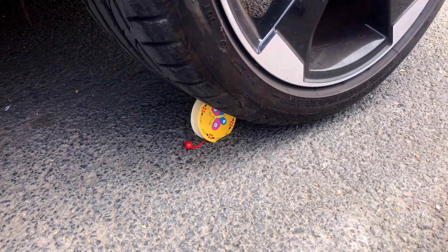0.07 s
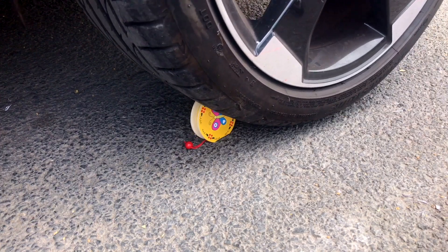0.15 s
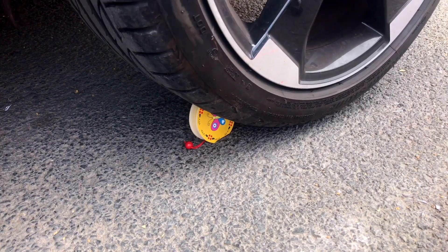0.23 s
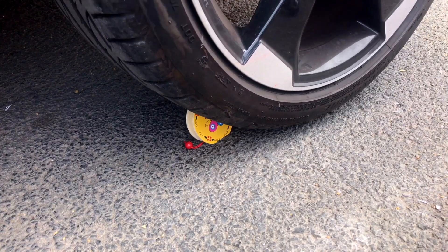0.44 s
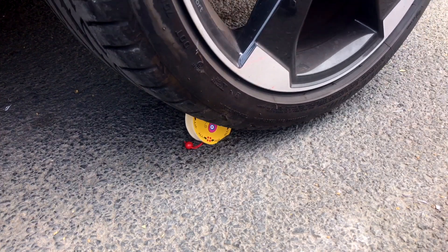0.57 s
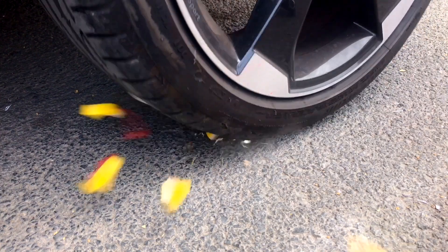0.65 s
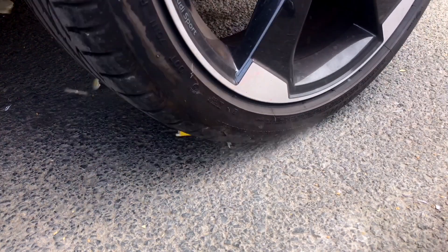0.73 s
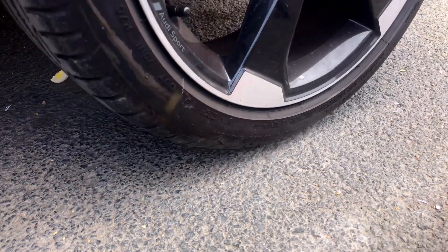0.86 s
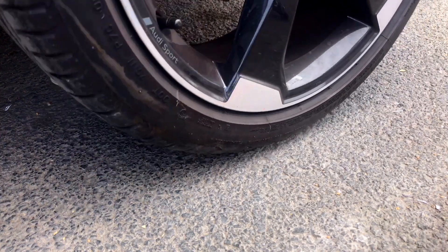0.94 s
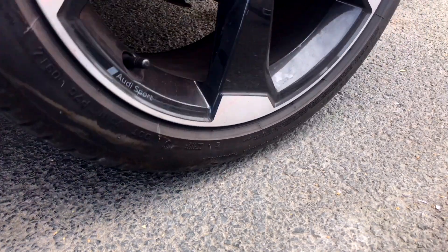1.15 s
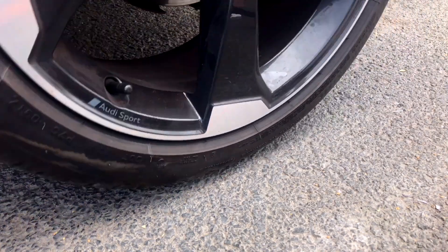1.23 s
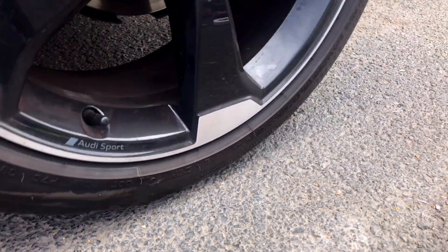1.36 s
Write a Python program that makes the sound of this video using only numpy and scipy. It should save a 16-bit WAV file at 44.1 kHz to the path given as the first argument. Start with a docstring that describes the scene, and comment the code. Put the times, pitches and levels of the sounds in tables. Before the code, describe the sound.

A plastic tub is squashed by a slow car tyre on asphalt: raspy rising squeal with hiss, clicks and sputters, a sharp wet burst with low thump, then grit crackles over quiet engine idle; close, outdoors.

```python
"""On asphalt, a car tyre rolls slowly over a small filled plastic tub, close to the microphone.
A fluttering slit at the lid excites the tub's resonances as a squeal and modulates noise into spray.
Falling tones and noise bursts make the sputter, the crack and the glugs; a rising sine makes the thump.
Decaying sines ring the wheel, brief resonant noise crackles under the tread, and harmonics of
the firing rate hum as the engine idles."""
import sys
import numpy as np
from scipy import signal
from scipy.fft import rfft, irfft, next_fast_len
from scipy.io import wavfile
from scipy.ndimage import uniform_filter1d, map_coordinates

SR = 44100
rng = np.random.default_rng(int(sys.argv[2]) if len(sys.argv) > 2 else 0)


def generate_wav(signal):
    """Clip the signal to [-1, 1] and save it as 16-bit WAV at the path in sys.argv[1]."""
    frames = np.transpose(np.atleast_2d(signal))
    scaled = np.clip(frames, -1, 1) * 32767
    pcm = np.round(scaled).astype(np.int16)
    wavfile.write(sys.argv[1], SR, pcm)


N = 61739  # samples
POP_S = .5948  # the air pops out, the flow through the slit ends and the wheel starts to ring


def amp(db):
    """Logarithmic level: decibels to amplitude gain."""
    return 10 ** (np.asarray(db) / 20)


def unit(x):
    """Normalisation of power: scale to rms 1."""
    return x / np.sqrt(np.mean(x ** 2) + 1e-20)


def clock():
    """Sampling: the time of every sample in seconds."""
    return np.arange(N) / SR


def curves(rows):
    """Linear interpolation: one value per sample for each column after the time."""
    times, *columns = np.transpose(rows)
    return [np.interp(clock(), times, column) for column in columns]


def wobble(rate):
    """Slow random modulation: a smooth curve through `rate` random knots a second."""
    return map_coordinates(rng.standard_normal(400), [clock() * rate], mode="mirror")


def white():
    """White noise: independent Gaussian samples."""
    return rng.standard_normal(N)


def filtered(x, response):
    """Linear filtering: multiply the spectrum by a response of frequency."""
    size = next_fast_len(N + SR // 2)
    spectrum = rfft(x, size) * response(np.fft.rfftfreq(size, 1 / SR))
    return irfft(spectrum, size)[:N]


def coloured(x, points):
    """Spectral shaping: filter through (f/Hz, level/dB) points on a log axis, to rms 1."""
    f, db = np.transpose(points)
    return unit(filtered(x, lambda hz: amp(np.interp(np.log(hz + 1), np.log(f), db))))


def noise(points):
    """Coloured noise: white noise with a shaped spectrum, at rms 1."""
    return coloured(white(), points)


def resonate(x, peaks):
    """Parallel damped resonators: (f/Hz, width/Hz, level/dB) peaks summed, to rms 1."""
    def response(f):
        total = 0
        for centre, width, db in peaks:
            damping = 1j * f * width
            total = total + amp(db) * damping / (centre * centre - f * f + damping)
        return total
    return unit(filtered(x, response))


def envelope(start, attack, hold, t60):
    """Exponential decay: linear attack, hold counted from the start, then 60 dB lost per t60."""
    age = clock() - start
    return np.clip(age / attack, 0, 1) * amp(-60 * np.maximum(age - hold, 0) / t60)


def grainy(depth_db, smoothing):
    """Amplitude modulation: random rough gain, averaged over `smoothing` samples, at rms 1."""
    return unit(amp(depth_db * unit(uniform_filter1d(white(), size=smoothing))))


def blip(s, hz, width, sag):
    """Air release as a falling tone, `hz` at its centre s, under a sech swell; gives tone and swell."""
    age = np.clip(clock() - s, -10 * width, 10 * width)
    swell = 1 / np.cosh(age / width * np.sqrt(2))
    cycles = hz * (1 - np.exp(-sag * age)) / sag
    return swell * np.sin(2 * np.pi * cycles), swell


# car motion: t/s, engine hum level/dB, tread on asphalt level/dB
CAR_LEVELS = [(0, -37, -54.5), (.55, -35, -40.5), (.72, -40.5, -61.5), (.81, -48, -58), (.88, -40.5, -57),
              (1.15, -40, -53.5), (1.4, -33, -50)]
# engine harmonics: multiple of the firing rate, relative level/dB
ENGINE_ORDERS = [(.5, -19), (1, 3), (1.5, -2.5)]
# engine rumble spectrum: f/Hz, relative level/dB
ENGINE_RUMBLE = [(20, -5.5), (50, 4.5), (120, -3.5), (240, -17), (600, -18), (1200, -68)]
# tread noise spectrum: f/Hz, relative level/dB
TREAD_SPECTRUM = [(300, -36), (550, 8), (900, 1.5), (2400, 1.5), (15500, -14.5)]


def car():
    """Harmonic synthesis: engine orders over rumble, a faint whine as the car moves on, gritty tread."""
    engine_db, tread_db = curves(CAR_LEVELS)
    mean_firing_hz, mean_whine_hz = 59.85, 550
    firings = np.cumsum(mean_firing_hz * (1 + .015 * wobble(12))) / SR
    hum = sum(amp(db) * np.sin(2 * np.pi * (order * firings + rng.random()))
              for order, db in ENGINE_ORDERS)
    engine = amp(engine_db) * (unit(hum) + amp(-6) * noise(ENGINE_RUMBLE))
    whine_cycles = np.cumsum(mean_whine_hz * (1 + 0.0056 * wobble(34.1))) / SR
    whine_gain = amp(-53.5 + 2.5 * wobble(9.43))
    whine_fade = np.clip((clock() - 0.754) / 0.14, 0, 1)
    whine = np.sin(2 * np.pi * whine_cycles) * whine_gain * whine_fade
    tread = amp(tread_db) * grainy(depth_db=2, smoothing=90) * noise(TREAD_SPECTRUM)
    return engine + whine + tread


# groan of the wall under load: t/s, level/dB
GROAN_LEVELS = [(.2, -60), (.4, -38.5), (.59, -29.5), (.66, -30), (.73, -52.5)]
# groan spectrum: f/Hz, relative level/dB
GROAN_SPECTRUM = [(50, 2), (120, 2.5), (230, 1.5), (330, -14.5), (900, -62)]


def groan():
    """Low-frequency noise under a load curve: the wall rumbles as it folds."""
    return amp(curves(GROAN_LEVELS)[0]) * noise(GROAN_SPECTRUM)


# modes of the wheel: f/Hz, level/dB, t60/s
WHEEL_MODES = [(211.4, -25, 0.26), (624, -31.5, 0.2), (1444, -38, 0.14), (2170, -28, 0.082)]


def wheel():
    """Modal decay: the burst rings the air in the tyre and the metal rim."""
    age = clock() - POP_S
    out = np.zeros(N)
    for hz, db, t60 in WHEEL_MODES:
        mode = np.sin(2 * np.pi * (hz * age + rng.random()))
        out += amp(db) * envelope(POP_S, 0.0026, 0.017, t60) * mode
    return out


# fractures under the tread: t/s, crack level/dB, ring f/Hz, t60/s, ring over crack level/dB
CRACKLE_EVENTS = [(0.646, -43.5, 1370, 0.029, 16.5), (0.8738, -43.5, 12500, 0.019, 1),
                  (0.878, -45, 6080, 0.1, 5), (0.9302, -42.5, 3020, 0.022, 13),
                  (0.938, -47.5, 2420, 0.074, 8.5), (1.037, -40, 870, 0.015, -3.5),
                  (1.048, -38.5, 7400, 0.022, 3), (1.046, -48, 5060, 0.046, 8),
                  (1.07, -46, 12100, 0.079, -2.5), (1.098, -56, 3200, 0.068, 6.5),
                  (1.283, -48, 12100, 0.076, 2.5), (1.3431, -40.5, 2020, 0.062, 7),
                  (1.3442, -47, 1070, 0.041, 3), (1.355, -41, 4200, 0.069, -1),
                  (1.3547, -37, 5150, 0.032, 1)]
# crack spectrum: f/Hz, relative level/dB
CRACK_SPECTRUM = [(200, -37), (900, 8.5), (7000, 5.5), (12000, 0.5)]


def crackles():
    """Brittle fracture: shards and grit crack under the tread, each with a ring band of its own."""
    out = np.zeros(N)
    for s, db, hz, t60, ring_db in CRACKLE_EVENTS:
        ring = resonate(white(), [(hz, hz * 0.13, 0)])
        crack = noise(CRACK_SPECTRUM)
        out += amp(db) * envelope(s, 0.000093, 0.00059, t60) * (crack + amp(ring_db) * ring)
    return out


# snaps of the plastic wall: t/s, level/dB, t60/s
SNAP_EVENTS = [(0.3209, -16.5, 0.0098), (0.4319, -14, 0.0098), (0.5813, -20, 0.01), (0.5843, -20.5, 0.023),
               (.646, -29, 0.0081)]
# snap spectrum: f/Hz, relative level/dB
SNAP_SPECTRUM = [(500, -17), (2500, 0.5), (15000, 0.5)]


def snaps():
    """Buckling impulses: the wall kinks with short bright clicks."""
    gain = sum(amp(db) * envelope(s, 0.00025, 0.00015, t60) for s, db, t60 in SNAP_EVENTS)
    return noise(SNAP_SPECTRUM) * gain


# spits of trapped air: t/s, level/dB
SPIT_EVENTS = [(0.375, -28), (0.395, -22), (0.4125, -26), (0.4233, -19.5), (0.4442, -18.5), (0.4535, -27),
               (0.4727, -19.5), (.482, -19), (0.5054, -22), (.528, -22.5), (.54, -20.5), (0.5578, -22.5),
               (0.5686, -20.5), (0.577, -18.5)]


def sputter():
    """Intermittent jet: as the tub empties, the flow breaks into falling tones with bursts of mist."""
    out = np.zeros(N)
    mist = noise([(600, 12.5), (1500, 1.5), (8000, 4.0), (15000, -33)])  # f/Hz, relative level/dB
    for s, db in SPIT_EVENTS:
        hz = 1244 * (1 + .05 * rng.standard_normal())
        tone, swell = blip(s, hz, width=0.00066, sag=130)
        out += amp(db) * (tone + amp(-6) * swell * mist)
    return out


# outflow, also played by squirt: t/s, spray level/dB, squeal level/dB before faltering, roughness 0-1
OUTFLOW = [(.052, -62, -60, .15), (.072, -41.5, -46, .15), (.15, -39.5, -41, .3), (.2, -34.5, -39, .4),
           (.218, -32.5, -31, .35), (.262, -31, -35.5, .5), (.29, -32.5, -34, .35), (.358, -32, -33.5, .6),
           (.425, -34.5, -35.5, .7), (.462, -44, -44, .4), (.495, -40, -35, .25), (.53, -42, -47, .9)]
# spray spectrum at full flow: f/Hz, relative level/dB
SPRAY_SPECTRUM = [(700, -9), (1400, 2), (2600, -10), (3600, 1.5), (4600, -11), (5500, -5), (6100, 5),
                  (6800, -9), (8500, 0), (9400, 4.5), (10350, -12), (11400, 4.5), (13700, -5), (14700, 1),
                  (15600, -2)]


def spray(cycles):
    """Modulated turbulence: hiss puffs with the flutter, climbs in pitch, turns shrill at full flow."""
    full_flow_s, rise_per_s, puff_depth = .24, .11, .45
    puffs = unit(white() * (1 + puff_depth * np.cos(2 * np.pi * cycles)) ** 2)
    since = clock() - full_flow_s
    shrill = resonate(white(), [(11500, 450, 0)]) * amp(-4) / np.cosh(since / .03)
    # ever faster reading raises the resonances as the slit is squeezed
    position = np.cumsum(1 + rise_per_s * since)
    hiss = map_coordinates(coloured(puffs, SPRAY_SPECTRUM), [position], order=5, mode="mirror")
    return amp(curves(OUTFLOW)[0]) * (hiss + shrill)


# flutter of the slit: t/s, pitch f/Hz before roughness
FLUTTER_PITCH = [(.057, 270), (.105, 305), (.14, 520), (.158, 900), (.178, 1040), (.2, 860), (.213, 700),
                 (.228, 665), (.243, 715), (.248, 1150), (.271, 990), (.276, 660), (.296, 725), (.335, 670),
                 (.385, 780), (.42, 640), (.497, 780)]
# resonances of tub and slit: f/Hz, width/Hz, relative level/dB
TUB_RESONANCES = [(1016, 87, -3.5), (1330, 260, 9), (1900, 160, -8)]


def squirt():
    """Source-filter flutter: each opening rings the tub; rough flow wanders, falters and alternates."""
    pitch, = curves(FLUTTER_PITCH)
    _, squeal_db, rough = curves(OUTFLOW)
    rough = np.clip(rough, 0, 1)
    jitter = .05 * unit(uniform_filter1d(white(), size=40))
    wander = .03 * wobble(110.25)
    cycles = np.cumsum(pitch * (1 + rough * (jitter + wander))) / SR

    # one opening per whole cycle, strong and weak in turn where the flow is rough
    count = np.arange(1, int(cycles[-1]))
    at = np.interp(count, cycles, np.arange(N))
    near = at.astype(int)
    scatter = amp(1.0 * white()[count])  # 1 dB
    alternation = 1 + .4 * rough[near] * (-1) ** count
    size = scatter * alternation / np.sqrt(pitch[near])

    # sinc pulses place the openings between samples
    taps = near[:, None] + np.arange(-8, 9)
    weights = size[:, None] * np.sinc(taps - at[:, None])
    pulses = np.bincount(np.clip(taps, 0, N - 1).ravel(), weights.ravel(), N)

    def squeal_band(f):
        """Band-pass response: steep skirts at 800 and 2300 Hz."""
        return (1 - 1 / (1 + (f / 800) ** 10)) / (1 + (f / 2300) ** 10)

    squeal = unit(filtered(resonate(pulses, TUB_RESONANCES), squeal_band))
    running_power = np.abs(uniform_filter1d(squeal ** 2, size=700))
    squeal = squeal / np.sqrt(running_power + 1e-6)  # evened out, so the outflow sets the level
    squeal = squeal * amp(9 * rough * (np.tanh(wobble(220)) - 1.0))  # faltering, 0 to -18 dB
    return (amp(squeal_db) * squeal + spray(cycles)) * (clock() < POP_S)


# tears of the wall: t/s, level/dB, hold/s, t60/s
TEAR_EVENTS = [(0.5927, -14.5, 0.0047, 0.033), (0.604, -23, 0.00061, 0.012), (0.6052, -20, 0.0061, 0.11),
               (0.6473, -20.5, 0.0013, 0.012), (0.675, -43.5, 0.0086, 0.039)]
# tear spectrum: f/Hz, relative level/dB
TEAR_SPECTRUM = [(150, -5), (1000, -6.5), (2200, 2), (3300, -5.5), (5300, -3), (6500, -9.5), (9200, -8),
                 (10300, -22), (11500, -10.5), (15500, -10.5)]


def rip():
    """Tearing noise under low-pass occlusion: treble is lost as the tyre closes over the rip."""
    gain = sum(amp(db) * envelope(s, 0.00093, hold, t60) for s, db, hold, t60 in TEAR_EVENTS)
    tearing = grainy(depth_db=3, smoothing=30) * noise(TEAR_SPECTRUM) * gain
    covered = np.clip((clock() - POP_S) / 0.05, 0, 1)
    dulled = filtered(tearing, lambda hz: 1 / (1 + (hz / 4600) ** 2))
    return (1 - covered) * tearing + covered * dulled


def thump():
    """Frequency-swept cavity: a sine climbs from 42 Hz at 1500 Hz/s as the tub collapses."""
    start_s = .6055
    age = np.maximum(clock() - start_s, 0)
    tone = np.sin(2 * np.pi * (42 * age + 1500 * age ** 2 / 2))
    return tone * amp(-10.5) * envelope(start_s, .002, hold=.031, t60=.035)


# glugs of the collapsing tub: t/s, level/dB, f/Hz at the centre of the glug
GLUG_EVENTS = [(.5978, -17.5, 280), (.617, -22, 380), (.6315, -18.5, 235)]
# gush spectrum: f/Hz, relative level/dB
GUSH_SPECTRUM = [(25, 1), (140, 9), (240, -2.5), (380, -6), (540, -38), (1200, -40)]


def burst():
    """Sudden pressure release: the wall rips, air pops out and the collapsing cavity thumps and glugs."""
    pop = amp(-11.5) * blip(POP_S, 1540, width=0.00099, sag=335)[0]
    gush = amp(-18) * noise(GUSH_SPECTRUM) * envelope(.594, 0.0063, 0.038, 0.035)
    glugs = sum(amp(db) * blip(s, hz, width=.003, sag=50)[0] for s, db, hz in GLUG_EVENTS)
    return rip() + pop + thump() + glugs + gush


def wheel_arch(x):
    """Diffuse reflection: a short decaying scatter from the road and the car's body."""
    tail = white() * envelope(0.0026, 0.0023, 0.0059, t60=0.046)
    return x + amp(-10.5) * signal.fftconvolve(x, tail / np.linalg.norm(tail))[:N]


def scene():
    """Superposition: all sources sum at one spot, the same in both ears."""
    reflected = wheel_arch(crackles() + snaps() + sputter() + squirt() + burst())
    mono = car() + groan() + wheel() + reflected
    return np.array([mono, mono])


def record(dry):
    """Band limiting and soft saturation: deepest bass reduced, peaks rounded, nothing above 15850 Hz."""
    low_cut_hz, ceiling, top_hz = 22, 0.4, 15850
    dry = signal.sosfilt(signal.butter(1, low_cut_hz, "high", fs=SR, output="sos"), dry)
    rounded = dry / (1 + np.abs(dry / ceiling) ** 6) ** (1 / 6)
    return np.array([filtered(channel, lambda hz: hz < top_hz) for channel in rounded])


dry = scene()
out = record(dry)
generate_wav(out)
```